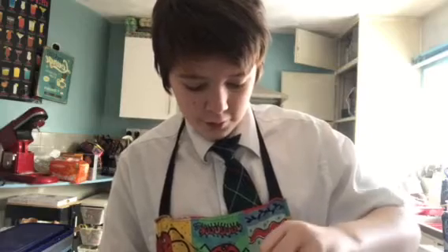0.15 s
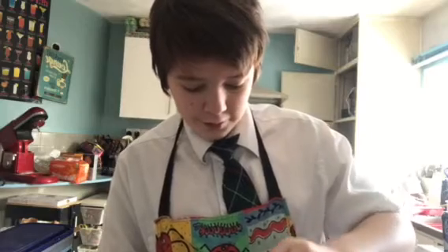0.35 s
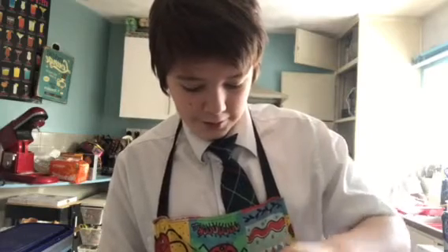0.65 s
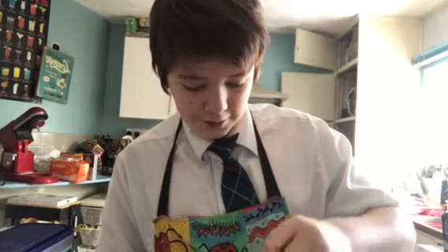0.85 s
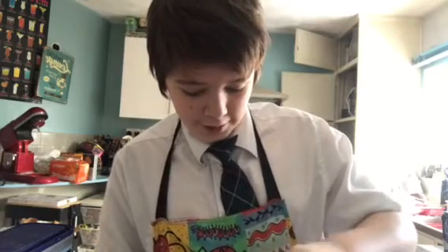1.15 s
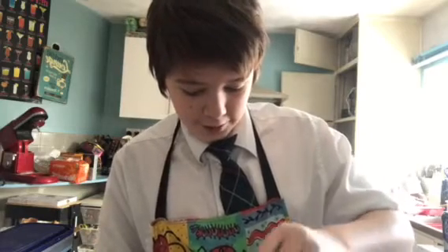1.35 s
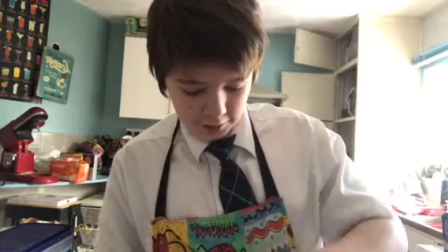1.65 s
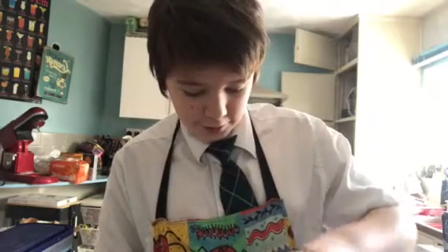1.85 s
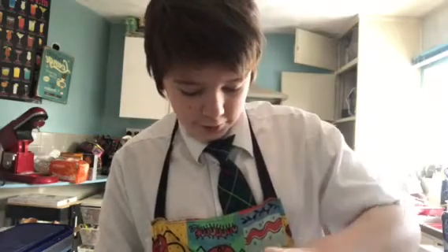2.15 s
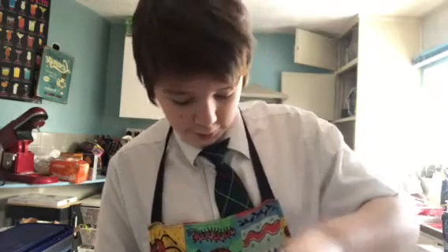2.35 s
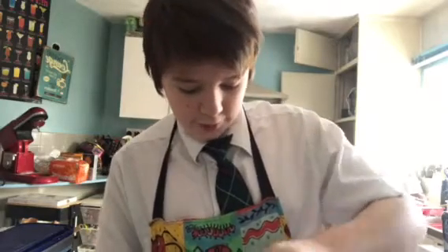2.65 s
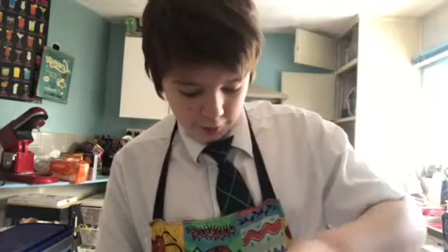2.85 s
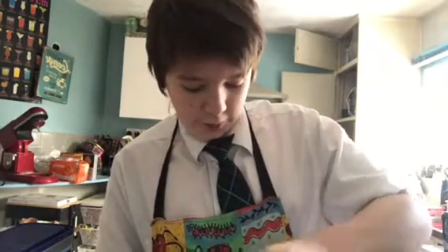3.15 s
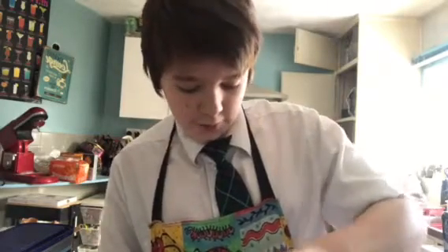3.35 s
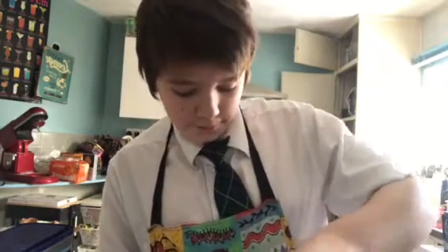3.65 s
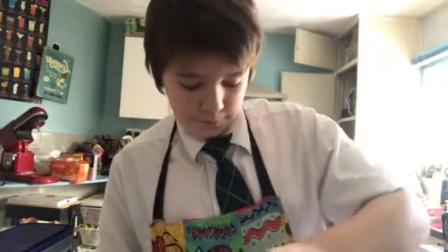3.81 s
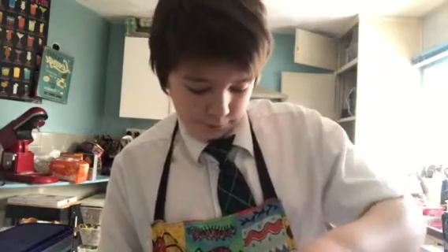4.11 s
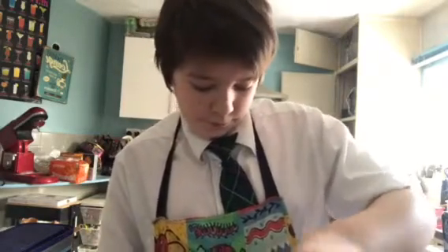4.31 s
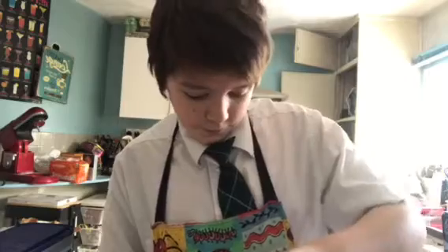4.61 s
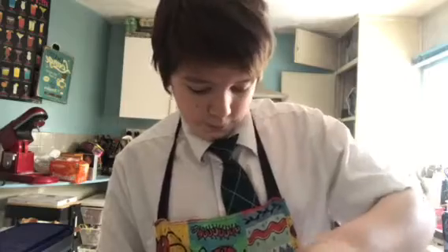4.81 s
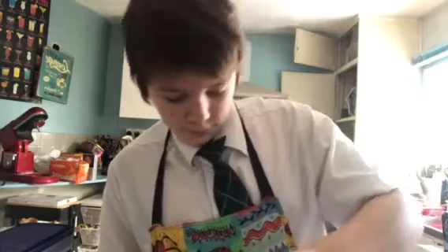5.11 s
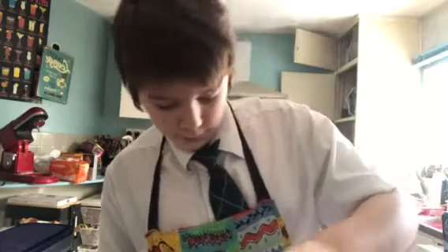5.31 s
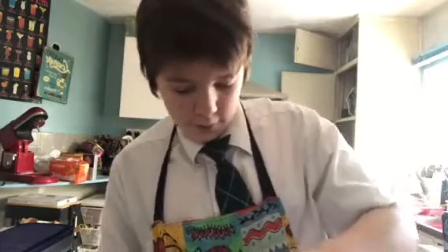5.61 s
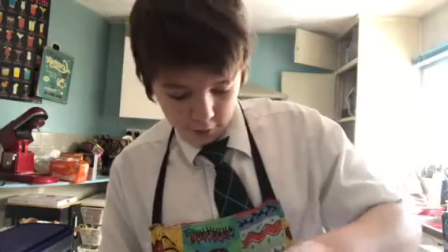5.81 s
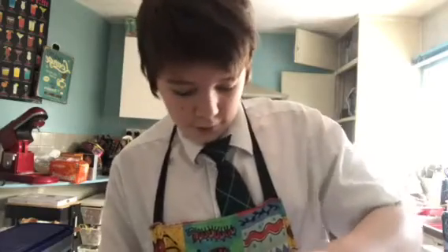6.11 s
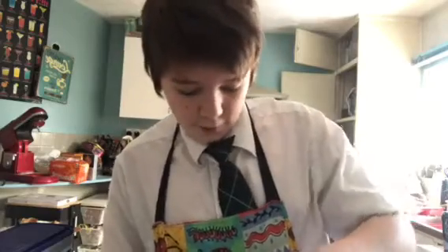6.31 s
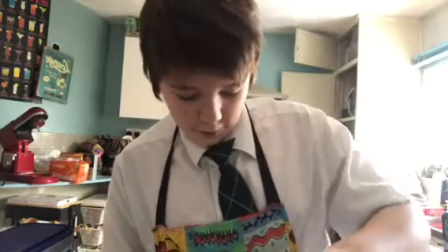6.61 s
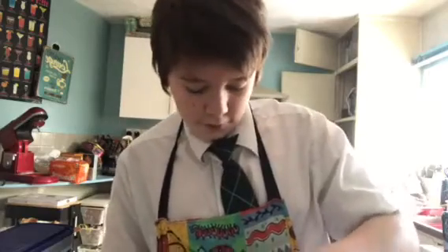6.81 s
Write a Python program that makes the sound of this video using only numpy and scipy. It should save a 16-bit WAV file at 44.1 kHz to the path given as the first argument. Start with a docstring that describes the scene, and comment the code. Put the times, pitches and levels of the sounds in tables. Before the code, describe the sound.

A spoon stirs thick batter in a ceramic mug, with uneven dull clinks, hollow knocks, soft scrapes and small wet pops in a quiet kitchen.

```python
"""Spoon stirring batter in a mug

A metal spoon stirs thick batter in a ceramic mug on a kitchen table, near a small microphone.
Clinks, hollow booms and table thuds are decaying sine waves and short puffs of noise.
Scrapes are dense clicks of friction sent through resonances; air pockets gulp and pop in the batter.
Filtered noise makes the room air and the short kitchen echo, and two sine waves make a faint hum."""
import sys
import numpy as np
from scipy import signal
from scipy.fft import rfft, irfft
from scipy.io import wavfile
from scipy.ndimage import uniform_filter1d

SR = 44100
rng = np.random.default_rng(int(sys.argv[2]) if len(sys.argv) > 2 else 0)


def wav_record(signal):
    """Record a signal, one row per channel, as 16-bit PCM in the file named by sys.argv[1]."""
    frames = np.transpose(np.atleast_2d(signal))
    bounded = np.clip(frames, -1, 1)
    # unit amplitude maps onto the largest positive 16-bit level
    quanta = np.round(bounded * 32767).astype(np.int16)
    wavfile.write(sys.argv[1], SR, quanta)


N = 306931
TIME = np.arange(N) / SR  # seconds, whole scene
AGE = TIME[:SR // 2]  # seconds since a single event began

# Levels in event and resonance tables are starting points: the functions may trim or scale them.
# Spoon and batter shove the mug. Each row: start in seconds, pitch of the hollow at its swell in Hz,
# hollow level in dB, slap of batter and base in dB, table level in dB.
MUG_SHOVES = [(0.4628, 550, -30, -38.5, -38.5), (0.485, 545, -36.5, -48, -71),
              (0.6181, 546, -43.5, -50.5, -51.5), (1.0433, 553.4, -16.5, -26, -41.5),
              (1.6312, 546, -21.5, -31, -44), (1.898, 553, -29.5, -41.5, -51),
              (1.951, 557, -32.5, -47.5, -70), (2.1531, 539, -31, -43, -43.5),
              (2.2264, 535, -33, -46, -51.5), (2.445, 556, -41.5, -51.5, -73),
              (2.545, 567, -32.5, -49, -70), (2.7509, 552, -34.5, -42, -54.5),
              (2.9737, 564, -39.5, -49, -55), (3.195, 535, -29.5, -39, -44), (3.287, 538, -40, -45.5, -71),
              (3.533, 562, -52, -57, -74), (3.578, 565, -37.5, -37.5, -51), (3.6523, 547, -36.5, -50, -67),
              (3.711, 584, -41, -56, -60), (3.7356, 560, -31, -41, -56), (3.804, 567, -32.5, -47, -47),
              (4.0672, 570, -56, -54.5, -68), (4.258, 529, -29.5, -44.5, -60.5),
              (4.2907, 569, -31, -45, -56), (4.361, 541.5, -29, -37, -63.5), (4.5714, 542, -35, -46, -50.5),
              (4.715, 555, -35.5, -40, -54), (4.806, 544, -49, -59.5, -78.5),
              (4.9953, 556, -32.5, -51, -64.5), (5.04, 543.4, -28, -37, -61.5),
              (5.2681, 543, -40.5, -54.5, -74.5), (5.4423, 570, -10.5, -37, -51),
              (5.6353, 550, -22.5, -34, -66), (5.888, 547, -54.5, -62, -73.5),
              (5.976, 563, -41.5, -54.5, -68), (6.256, 566, -33, -44, -61), (6.3927, 575, -47, -50.5, -80),
              (6.564, 553, -50.5, -59, -72), (6.6654, 558, -38.5, -48, -61), (6.856, 561, -36, -55, -69)]
# Metal meets the wall. Each row: start in seconds, wall ring in dB, spoon ring in dB, contact tick in dB.
WALL_HITS = [(0.4617, -47.5, -65, -54.5), (0.6089, -50, -71, -49.5), (0.6831, -56, -86, -61),
             (1.0401, -34.5, -68.5, -63.5), (1.6269, -45, -68, -90), (1.889, -35.5, -59.5, -60),
             (2.1334, -54.5, -74, -73), (2.4431, -55.5, -61, -62), (2.7199, -46.5, -56.5, -53.5),
             (2.9705, -49.5, -65.5, -65), (3.1908, -50, -65, -88), (3.58, -27.5, -40, -50),
             (3.646, -62, -57, -56), (3.734, -55, -80, -65), (3.802, -58, -67.5, -84),
             (4.251, -51, -66, -60.5), (4.289, -52.5, -57, -59), (4.357, -58.5, -85, -77),
             (4.484, -56, -57, -64), (4.6453, -57, -80, -62), (4.7085, -54, -69.5, -77),
             (4.8538, -49.5, -55.5, -62), (5.036, -56, -80, -76), (5.119, -52, -60, -73.5),
             (5.2358, -59, -64, -59.5), (5.4387, -26, -30.5, -27.5), (5.6231, -46, -51, -65),
             (5.8824, -57, -82, -66), (5.9385, -51.5, -69, -51.5), (5.976, -57, -62.5, -60),
             (6.250, -47, -58, -64.5), (6.3397, -53.5, -78, -69), (6.6621, -52, -64, -57),
             (6.8567, -54, -68, -60)]
# Tiny bubbles pop in the batter. Each row: start in seconds, level in dB.
BUBBLE_POPS = [(0.0572, -62), (0.9825, -56.5), (1.6609, -59.5), (2.2741, -56.5), (2.5786, -57),
               (2.8434, -60), (3.1548, -58), (3.401, -54.5), (3.962, -57.5), (4.6279, -63), (4.8102, -61.5),
               (5.4051, -59), (5.7951, -61), (6.1442, -62), (6.5382, -61.5)]
# The spoon drags along the wall. Each row: start in seconds, time pressing in in seconds,
# time easing off in seconds, hollow in dB, rasp of the glaze in dB, spoon ring in dB.
WALL_DRAGS = [(0.675, 0.051, 0.051, -44, -71.5, -85), (1.182, 0.042, 0.072, -35, -62.5, -81.5),
              (1.66, 0.036, 0.083, -43, -63, -77), (1.95, 0.029, 0.042, -37, -60, -66),
              (2.168, 0.053, 0.067, -41.5, -62, -73), (2.439, 0.065, 0.049, -44.5, -54.5, -70),
              (2.554, 0.044, 0.071, -33, -57.5, -87), (2.765, 0.011, 0.1, -44.5, -63, -70.5),
              (2.99, 0.013, 0.076, -51.5, -61, -73), (3.07, 0.086, .03, -61.5, -77, -70.5),
              (3.259, 0.056, 0.1, -40, -61.5, -70), (3.829, 0.094, 0.053, -31, -52, -71),
              (3.984, 0.013, 0.14, -57.5, -62, -71), (4.246, .02, 0.093, -39.5, -62, -66.5),
              (4.474, 0.033, 0.11, -31.5, -49, -71), (4.61, 0.018, 0.053, -44, -66, -71),
              (4.849, .06, 0.12, -42.5, -60.5, -72), (5.07, 0.063, 0.099, -36, -52.5, -74),
              (5.664, 0.032, 0.068, -37, -55, -67), (5.745, 0.031, 0.048, -41.5, -63, -70.5),
              (6.0, 0.051, 0.044, -43.5, -68.5, -82.5), (6.28, 0.017, 0.083, -43.5, -58, -71),
              (6.374, 0.023, 0.022, -51, -56, -84), (6.86, 0.027, 0.046, -50, -60, -70),
              (6.925, 0.031, .04, -50, -58, -82)]
# Big air pockets gulp as the spoon pulls free. Each row: start in seconds, pitch in Hz, level in dB.
AIR_GULPS = [(3.751, 273, -46), (4.377, 262, -48.5), (4.729, 255, -54.5), (5.047, 265.5, -43.5),
             (5.648, 235, -52), (6.265, 284, -51.5), (6.924, 228, -50)]

# Resonances. Each row: pitch in Hz, level in dB, time to fade by 60 dB in seconds.
# The hand-held spoon, columns as above.
SPOON_MODES = [(4266, -21.5, 0.074), (4354, -6, 0.016), (5187, -13.5, 0.048), (6770, 1, 0.041),
               (6970, -12.5, 0.07), (9070, -14.5, 0.043), (9600, -23.5, 0.071), (12500, -21.5, .025)]
# The whole table, columns as above.
TABLE_MODES = [(56, -9, 0.16), (86.57, 0.5, 0.32), (104, -10, 0.19), (131, -4.5, .12), (167, -7.5, 0.13),
               (226, -9.5, 0.37)]
# Air pockets squeezed in the batter, columns as above.
PLOP_MODES = [(634, 1, 0.058), (795.5, -1.5, 0.023), (850, -1, 0.0065)]
# The batter-damped belly of the mug, columns as above.
BELLY_MODES = [(958, 3.5, 0.046), (1135, 2, 0.043), (1155, 0.5, 0.036), (1250, -1.5, 0.061),
               (1352, -2, 0.049), (1496, -3.5, 0.04), (1610, -4.5, 0.022), (1810, 6.5, 0.0069)]
# The mug's free rim, columns as above.
RIM_MODES = [(2025, -8.5, 0.035), (2177, -3.5, 0.054), (2229, 1, 0.031), (2384, -0.5, 0.031),
             (2547, -2, 0.039), (2692, -11.5, 0.025), (2857, -6.5, 0.052)]

# Noise colours. Each row: frequency in Hz, relative level in dB per Hz.
# Steel grinding on glaze, columns as above.
RASP_COLOUR = [(150, -29), (260, 7), (420, 18.5), (700, -5), (850, 4.5), (980, 11), (1120, -13.5),
               (1400, 5), (1750, 0), (2250, -1.5), (2900, -6.5), (3500, -14.5), (7000, -28), (15000, -27.5)]
# A sharp contact, columns as above.
TICK_COLOUR = [(300, -34.5), (1200, 12.5), (2600, 2.5), (3500, -1), (4600, -1), (6000, 4), (9200, -4.5),
               (10400, -10), (12500, -3), (16000, -19.5)]
# The mug's base on the table top, columns as above.
THUD_COLOUR = [(100, -13), (180, -15.5), (226, -0.5), (290, -4.5), (360, 3), (430, 8.5), (520, -14),
               (700, -3.5), (1500, -53)]
# Batter dragged along the wall, columns as above.
SLOP_COLOUR = [(150, -27.5), (300, -6), (400, 5.5), (660, 0.5), (800, -16.5), (1100, -10.5), (2000, -53.5)]
# A tiny bubble snapping open, columns as above.
SNAP_COLOUR = [(500, -25.5), (2000, -1.5), (4500, -3), (9000, 1), (10400, -7), (13000, -2.5), (16000, -8.5)]
# Still room air and microphone hiss, columns as above.
AIR_COLOUR = [(25, -24.5), (50, 7.5), (75, 2), (130, -4), (250, -1.5), (500, -5.5), (900, -12.5),
              (2000, -14.5), (3200, -20.5), (5000, -23), (9000, -26), (16000, -32.5)]

# Kitchen appliances hum. Each row: pitch in Hz, rms level in dB ahead of the microphone.
HUM_TONES = [(49, -79), (101, -69.5)]
# Strength of the kitchen's echo. Each row: frequency in Hz, level in dB.
ECHO_COLOUR = [(100, -1.5), (550, -18.5), (1000, -13), (2300, -8), (4000, -19.5), (7000, -14), (15000, -30)]
# Length of the kitchen's echo. Each row: frequency in Hz, time to fade by 60 dB in seconds.
ECHO_T60 = [(100, 0.63), (600, 0.23), (2300, 0.33), (7000, 0.34), (15000, 0.24)]


def undb(db):
    """Turn decibels into a gain."""
    return 10 ** (np.asarray(db) / 20)


def unit(x):
    """Scale to an rms (average strength) of 1."""
    return x / np.sqrt(np.mean(x ** 2))


def crest(x, size):
    """Scale so that the loudest stretch of size samples has an rms of 1."""
    return x / np.sqrt(uniform_filter1d(x ** 2, size).max())


def add(out, s, x):
    """Mix x into out from time s on, or from the very start if s is negative."""
    i = max(int(s * SR), 0)
    out[i:i + len(x)] += x[:max(len(out) - i, 0)]


def read(points, hz):
    """Look up a value in a table of frequencies, spaced the way we hear pitch."""
    f, value = np.transpose(points)
    return np.interp(np.log(np.maximum(hz, 1)), np.log(f), value)


def through(x, response):
    """Pass x through something that answers a single click with response."""
    return signal.fftconvolve(x, response)[:len(x)]


def colour(x, points, size=2048):
    """Filter x to the given spectrum, with no sound ahead of its cause (minimum phase)."""
    gain = undb(read(points, np.arange(size // 2 + 1) * SR / size))
    cepstrum = irfft(np.log(gain))
    # fold the second half onto the first, so the response starts at once
    cepstrum[1:size // 2] *= 2
    cepstrum[size // 2 + 1:] = 0
    return through(x, irfft(np.exp(rfft(cepstrum))))


def fade(t60):
    """Die away smoothly, by 60 dB in t60 seconds."""
    return np.exp(-np.log(1000) * AGE / t60)


def soft(rise_s):
    """Rise gradually, as a cushioned contact does."""
    return 1 - np.exp(-AGE / rise_s)


def burst(points, t60):
    """A short coloured puff of noise."""
    return colour(rng.standard_normal(len(AGE)) * fade(t60), points)


def ring(modes, scatter_db, detune):
    """Struck resonances; random mix and tuning stand for a changing point of contact."""
    out = np.zeros(len(AGE))
    for k, (hz, db, t60) in enumerate(modes):
        level_chance, pitch_chance = rng.uniform(-1, 1, 2)
        tone = np.sin(2 * np.pi * hz * (1 + detune * pitch_chance) * AGE)
        out += (-1) ** k * undb(db + scatter_db * level_chance) * fade(t60) * tone
    return out


def walk(rate):
    """Slow random wander with a spread near 1."""
    size = int(SR / rate)
    steps = np.repeat(rng.standard_normal(N // size + 1), size)[:N]
    return unit(uniform_filter1d(steps, size))


def background():
    """Still room air and microphone hiss as filtered noise, plus a low hum of sine waves."""
    air = unit(colour(rng.standard_normal(N), AIR_COLOUR, size=8192))
    hum = sum(undb(db) * np.sqrt(2) * np.sin(2 * np.pi * hz * TIME) for hz, db in HUM_TONES)
    return undb(-64) * air + hum


def kitchen(x, gap_s=0.0017, build_s=0.011):
    """Diffuse echo off cupboards and tiles, in octave bands with their own decay."""
    response = 0
    for hz in 88 * 2. ** np.arange(8):
        sos = signal.butter(3, [hz / np.sqrt(2), hz * np.sqrt(2)], "band", fs=SR, output="sos")
        build = 1 - np.exp(-np.maximum(AGE - gap_s, 0) / build_s)
        shape = fade(read(ECHO_T60, hz)) * build
        noise = signal.sosfilt(sos, rng.standard_normal(len(AGE)))
        response = response + noise * shape / np.sqrt(np.sum(shape ** 2))
    return through(colour(x, ECHO_COLOUR), response)


def pops(pop_db=-2, snap_t60=0.01):
    """Tiny air pockets snap open, each a very short puff of noise."""
    out = np.zeros(N)
    for s, db in BUBBLE_POPS:
        snap = burst(SNAP_COLOUR, t60=snap_t60) * soft(.0004)
        add(out, s, undb(db + pop_db) * crest(snap, size=88))
    return out


def gulps(ring_t60=0.17, rise_s=0.0039):
    """Each pocket of air rings briefly in the thick batter, as one fading sine wave."""
    out = np.zeros(N)
    for s, hz, db in AIR_GULPS:
        gulp = fade(ring_t60) * soft(rise_s) * np.sin(2 * np.pi * hz * AGE)
        add(out, s, undb(db) * crest(gulp, size=350))
    return out


def slips(spread_db, rate):
    """Stick-slip friction: about rate clicks a second, of uneven size."""
    size_db = spread_db * np.minimum(rng.exponential(size=N), 3)
    clicks = (rng.random(N) < rate / SR) * rng.choice([-1, 1], N)
    return unit(clicks * undb(size_db))


def rubbed(force, modes, shift_db, rate):
    """Resonances under a travelling contact: each one swells and fades by itself."""
    out = 0
    for hz, db, t60 in modes:
        pole = np.exp((2j * np.pi * hz - np.log(1000) / t60) / SR)
        push = force * undb(shift_db * walk(rate))
        out = out + undb(db) * signal.lfilter([1], [1, -pole], push).imag
    return unit(out)


def drags(coating_db_per_s=40):
    """Each drag presses in and eases off; gives the strength of hollow, rasp and spoon ring over time."""
    hollow, rasp, spoon = np.zeros((3, N))
    for s, press_s, ease_s, hollow_db, rasp_db, spoon_db in WALL_DRAGS:
        pressure = np.interp(AGE, [0, press_s, press_s + ease_s], [0, 1, 0])
        # batter gathers under the spoon and dulls the friction as a drag goes on
        bare = undb(-coating_db_per_s * (AGE - press_s))
        # each voice grows as its own power of the pressure
        add(hollow, s, undb(hollow_db) * pressure ** 0.92)
        add(rasp, s, undb(rasp_db) * pressure ** 0.8 * bare)
        add(spoon, s, undb(spoon_db) * pressure ** 0.41 * bare)
    return hollow, rasp, spoon


def scrapes(hollow_hz=556, hollow_t60=0.1, steady=0.46, waver=0.01575, slop_db=-16, rasp_db=0.5,
            wall_db=-5, spoon_db=-4, catch_db=3, fleck_db=6):
    """Friction feeds the hollow, rasps on the glaze and tickles the spoon; the torn batter slops and crackles."""
    hollow, rasp, spoon = drags()
    drag, drift, chafe = (slips(spread_db=4, rate=1500) for _ in range(3))
    grit = slips(spread_db=3.5, rate=2000)
    tear = slips(spread_db=5.5, rate=600)

    # a complex signal holds the strength and phase of the hollow's swing
    swing = through(drag + 1j * drift, fade(hollow_t60) * soft(0.0014))
    # the steady drag of the hand evens out the swings of the resonance
    swing_power = uniform_filter1d(np.abs(swing) ** 2, size=900)
    swing = swing / (swing_power + 1e-6) ** (steady / 2)
    # the moving batter reshapes the hollow and bends its pitch
    cycles = np.cumsum(hollow_hz * (1 + waver * walk(rate=29))) / SR
    tone = unit(np.real(swing * np.exp(2j * np.pi * cycles)))
    slop = unit(colour(chafe, SLOP_COLOUR))

    grit = grit * undb(catch_db * walk(rate=200))
    wall = rubbed(grit, BELLY_MODES + RIM_MODES, shift_db=7.5, rate=14)
    glaze = unit(colour(grit, RASP_COLOUR)) + undb(wall_db) * wall

    # the spoon sings mostly in flecks, where bare steel catches the glaze
    flecks = chafe * undb(fleck_db * np.minimum(walk(rate=45), 1))
    metal = rubbed(flecks, SPOON_MODES, shift_db=3, rate=10)
    crackle = unit(through(tear, burst(TICK_COLOUR, t60=0.0026)))

    return (hollow * (tone + undb(slop_db) * slop)
            + undb(rasp_db) * rasp * glaze
            + spoon * (undb(spoon_db) * metal + crackle))


def chatter(x, t60, rate, bounce_db):
    """A contact is one blow and a quick run of weakening ones as the spoon skids."""
    hits = rng.random(len(AGE)) < rate / SR
    blows = undb(bounce_db) * hits * rng.standard_normal(len(AGE)) * fade(t60)
    blows[0] = 1
    return through(x, blows)


def clinks(wall_db=1, tick_db=2, crunch_db=-5, rim_db=2.5, slide_db=-17, slide_t60=0.047,
           cushion_s=0.001, rim_per_tick=0.51, bare_tick_db=-54):
    """The spoon slides in and strikes: a tick, then spoon and wall ring while it grinds on."""
    out = np.zeros(N)
    for s, wall, spoon, tick in WALL_HITS:
        # a tick under bare_tick_db means a coated spoon, which rings the rim less
        rim = rim_per_tick * min(tick - bare_tick_db, 0)
        # a light touch is cushioned by the film of batter, a hard one cuts through it
        onset = soft(cushion_s * undb(-.5 * (wall + 43.5)))
        belly = ring(BELLY_MODES, scatter_db=3, detune=.015)
        lip = ring(RIM_MODES, scatter_db=3, detune=.012)
        steel = ring(SPOON_MODES, scatter_db=3, detune=.002)

        mug = belly + undb(rim + rim_db) * lip
        body = crest(chatter(mug, t60=0.026, rate=2000, bounce_db=-6), size=176)
        crunch = crest(burst(RASP_COLOUR, t60=0.11), size=176)
        struck_wall = crest((body + undb(crunch_db) * crunch) * onset, size=176)
        struck_spoon = crest(chatter(steel, t60=0.037, rate=180, bounce_db=-10) * onset, size=176)
        contact = crest(burst(TICK_COLOUR, t60=0.014) * onset, size=88)
        # played backwards, the puff grows louder as the spoon slides in
        slide = crest(burst(RASP_COLOUR, t60=slide_t60), size=176)[::-1]

        add(out, s - AGE[-1], undb(wall + slide_db) * slide)
        add(out, s, undb(wall + wall_db) * struck_wall)
        add(out, s, undb(spoon) * struck_spoon)
        add(out, s, undb(tick + tick_db) * contact)
    return out


def knocks(swell_s=0.0088, ring_t60=0.2, ring_db=-21, bend=0.046, bend_s=0.014, plop_db=-1, thud_db=2,
           table_db=1, plop_growth=0.59, plop_from_db=-41.5):
    """The batter cushions each shove, so the hollow swells and sags in pitch; base and table sound too."""
    out = np.zeros(N)
    swell = (AGE / swell_s * np.exp(1 - AGE / swell_s)) ** 2
    swell = swell + undb(ring_db) * soft(swell_s) * fade(ring_t60)
    # the pitch starts high, passes its table value at swell_s and sinks on
    sag = 1 + bend * (np.exp(-AGE / bend_s) - np.exp(-swell_s / bend_s))
    for s, hz, hollow, slap, table in MUG_SHOVES:
        # a slap over plop_from_db squeezes air out: extra dB of plop per dB of slap
        plop = slap + plop_growth * max(slap - plop_from_db, 0)
        cycles = np.cumsum(hz * sag) / SR
        boom = swell * np.sin(2 * np.pi * cycles)
        squeezed_air = ring(PLOP_MODES, scatter_db=4.5, detune=0.048) * soft(0.00074)
        base = burst(THUD_COLOUR, t60=0.088) * soft(0.0031)
        table_top = ring(TABLE_MODES, scatter_db=1, detune=0.0047) * soft(.003)
        add(out, s, undb(hollow) * crest(boom, size=350))
        add(out, s, undb(plop + plop_db) * crest(squeezed_air, size=350))
        add(out, s, undb(slap + thud_db) * crest(base, size=350))
        add(out, s, undb(table + table_db) * crest(table_top, size=1100))
    return out


def scene():
    """The stirring, its echo and the quiet kitchen."""
    mug = pops() + gulps() + scrapes() + clinks() + knocks()
    return (background() + kitchen(mug) + mug)[None]


def record(dry, low_hz=42, top_hz=15900):
    """The small microphone loses the deepest bass, and the top is cut."""
    thin = signal.sosfilt(signal.butter(3, low_hz, "high", fs=SR, output="sos"), dry)
    return signal.sosfilt(signal.ellip(8, .2, 70, top_hz, fs=SR, output="sos"), thin)


dry = scene()
out = record(dry)
wav_record(out)
```